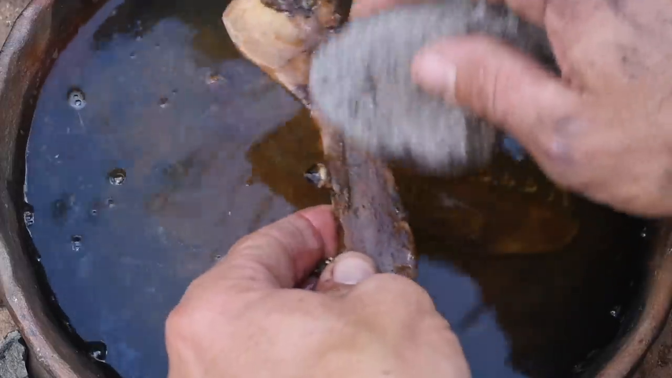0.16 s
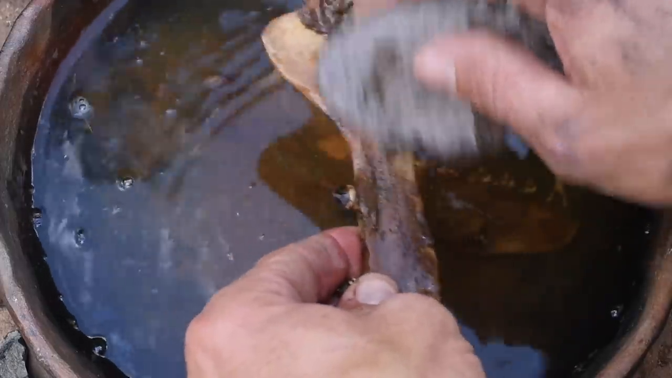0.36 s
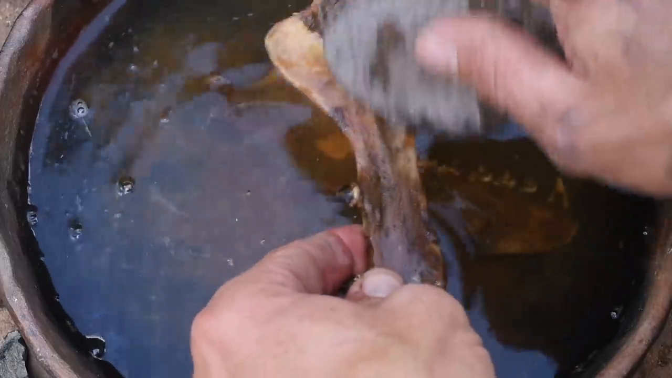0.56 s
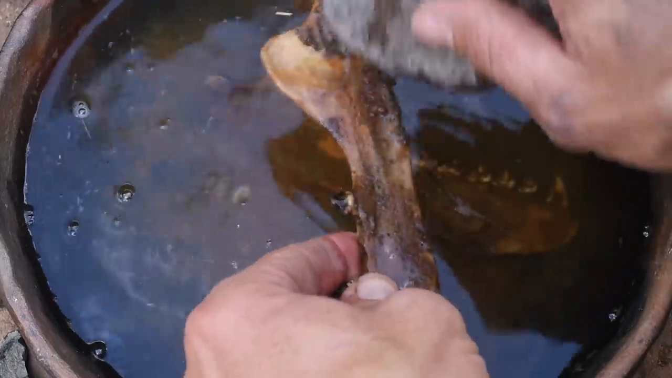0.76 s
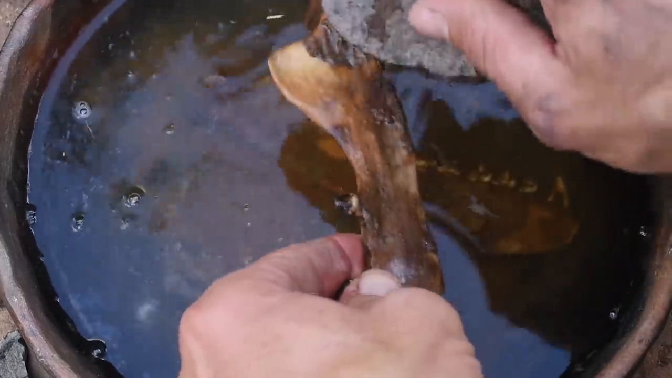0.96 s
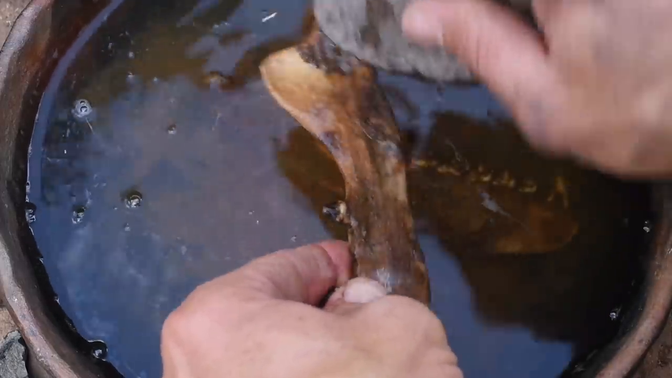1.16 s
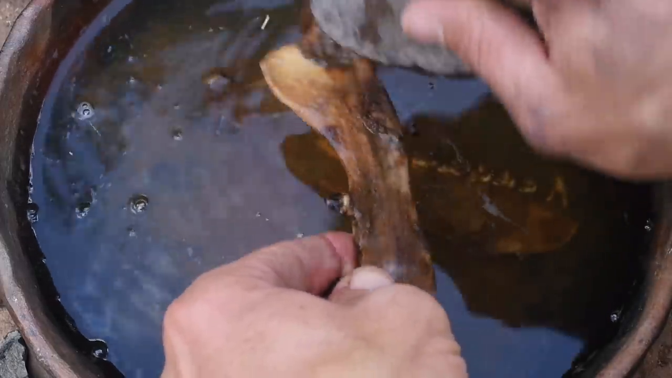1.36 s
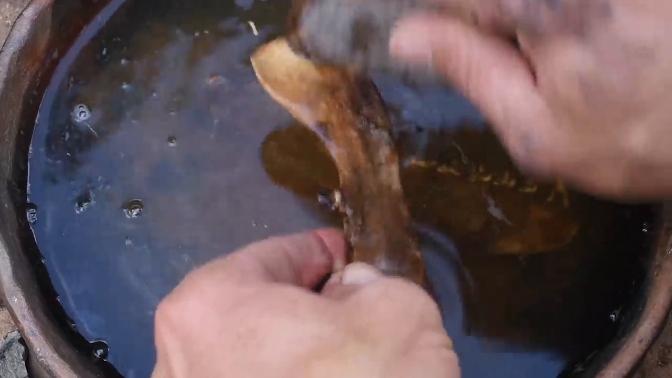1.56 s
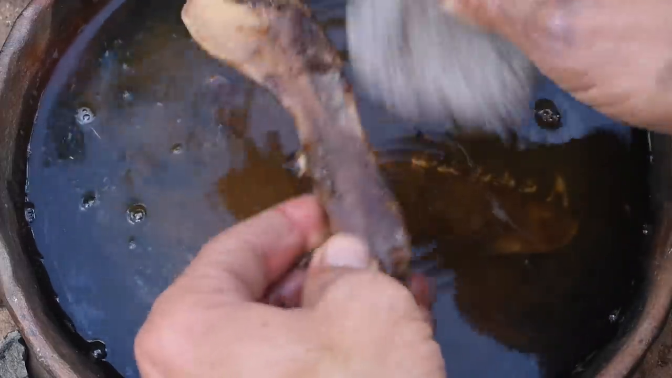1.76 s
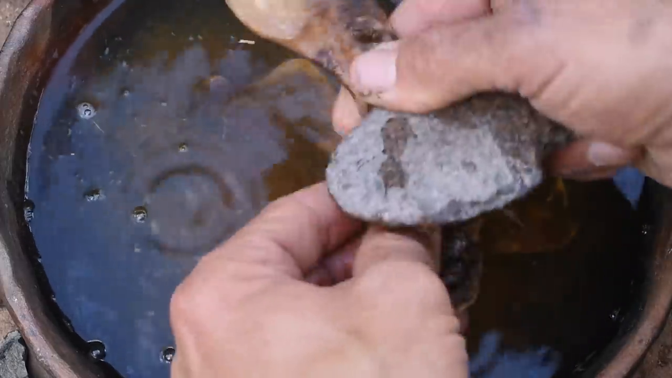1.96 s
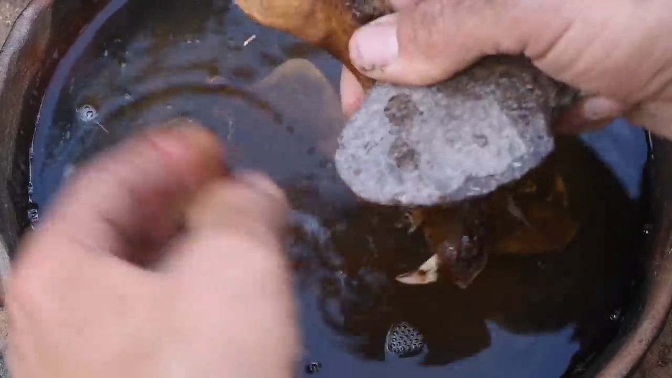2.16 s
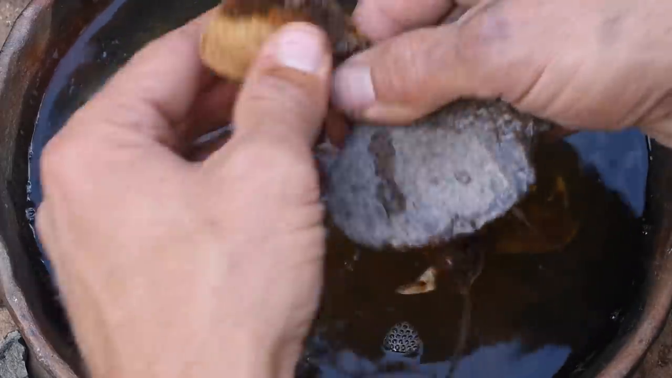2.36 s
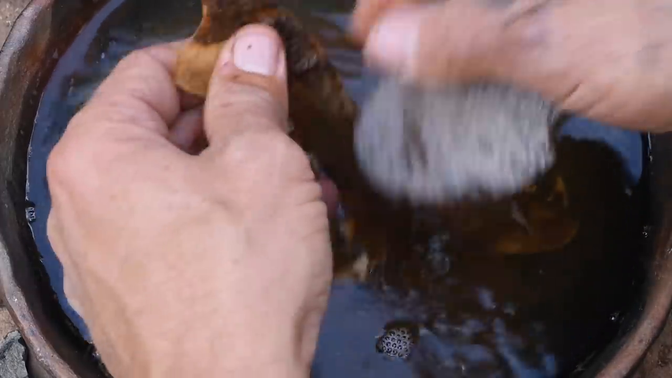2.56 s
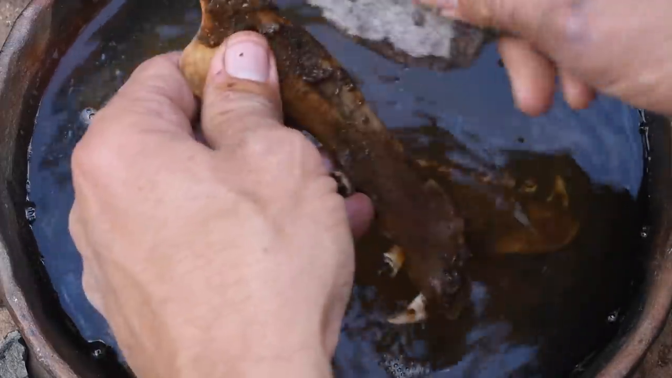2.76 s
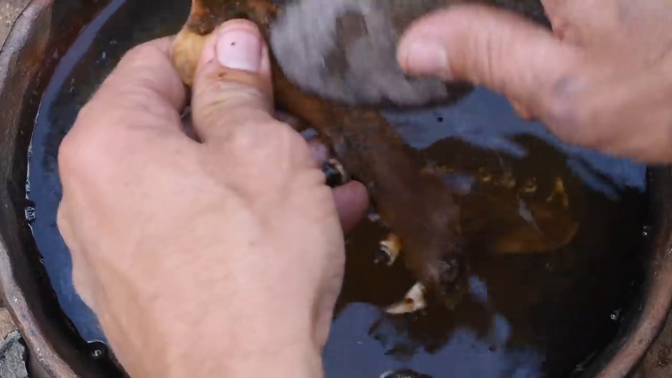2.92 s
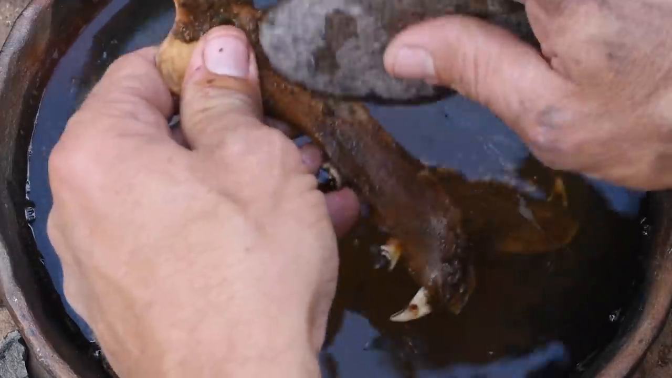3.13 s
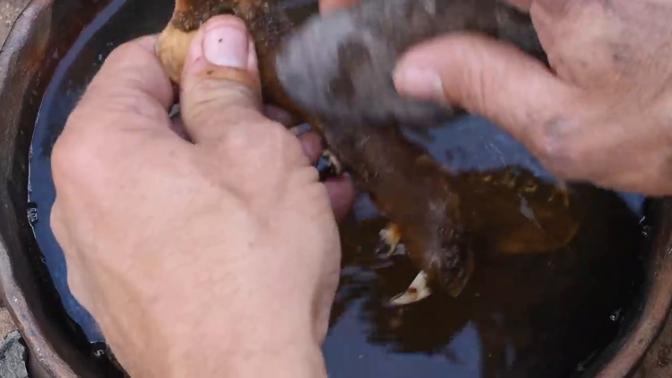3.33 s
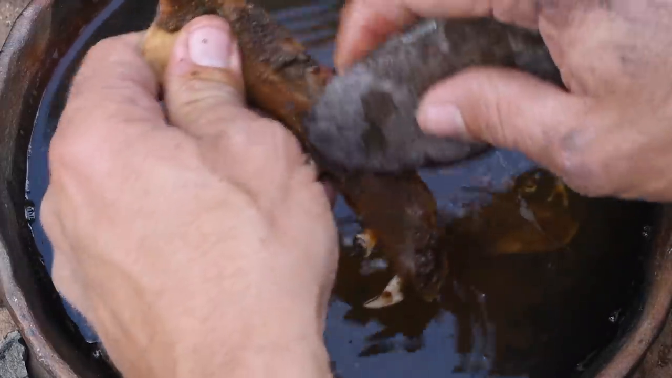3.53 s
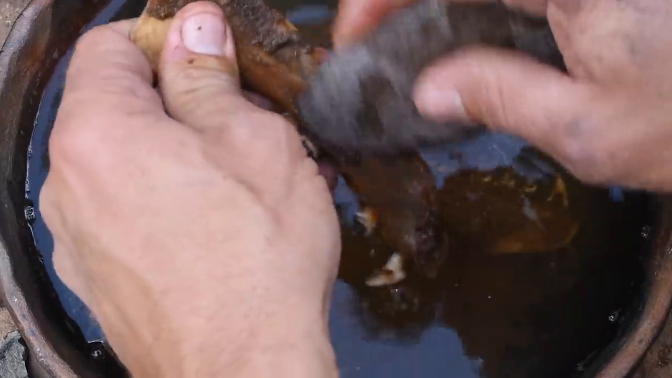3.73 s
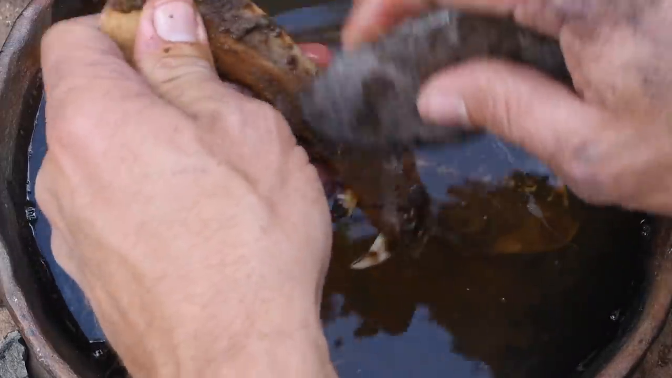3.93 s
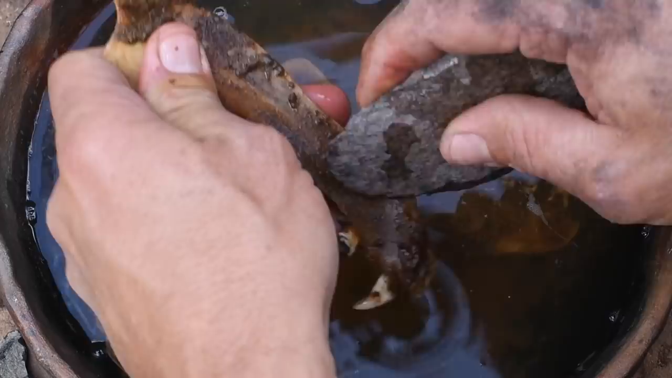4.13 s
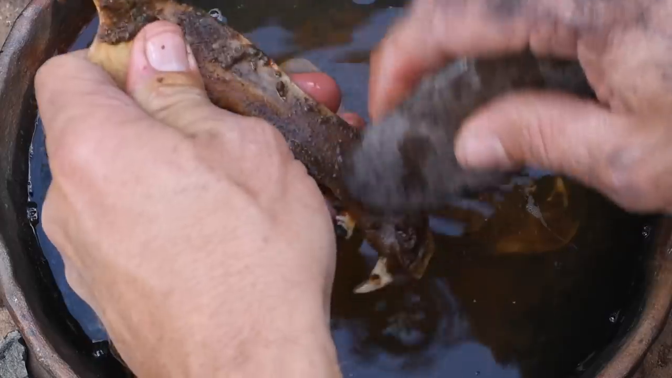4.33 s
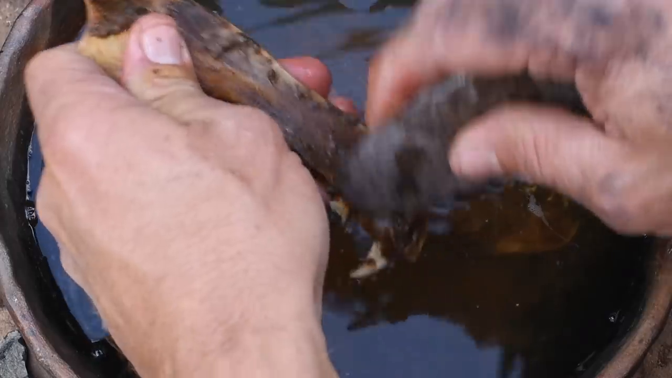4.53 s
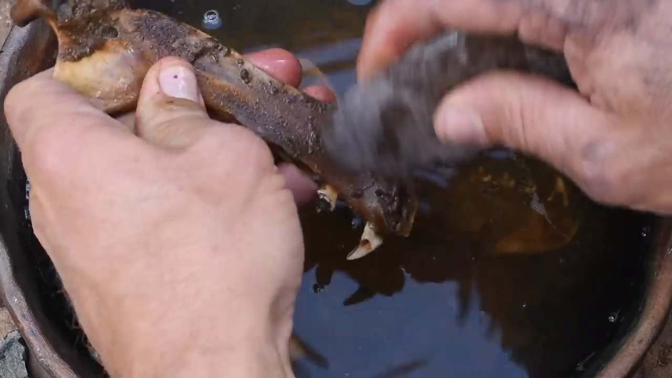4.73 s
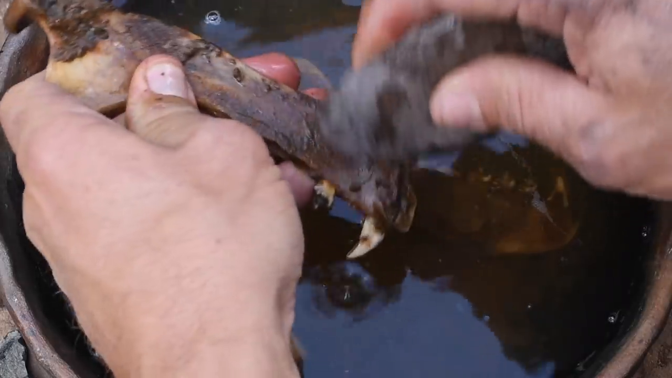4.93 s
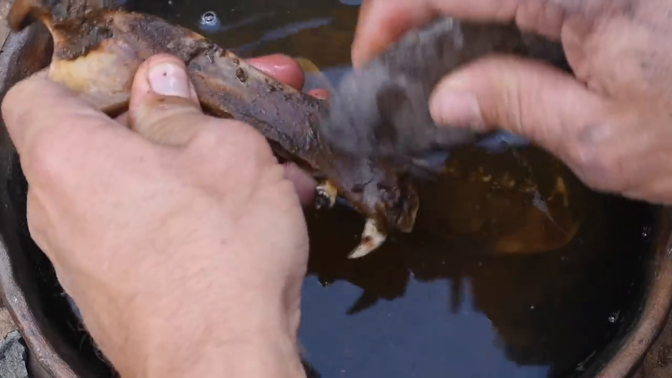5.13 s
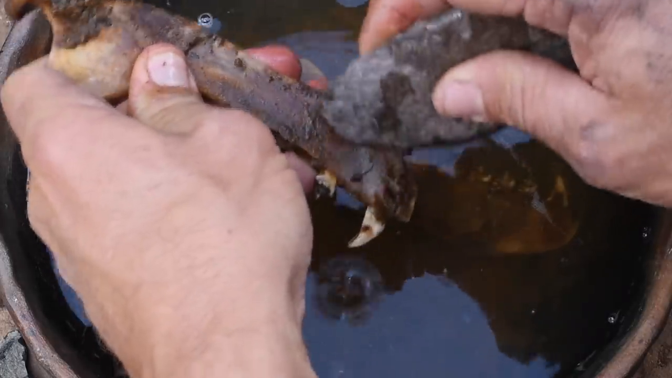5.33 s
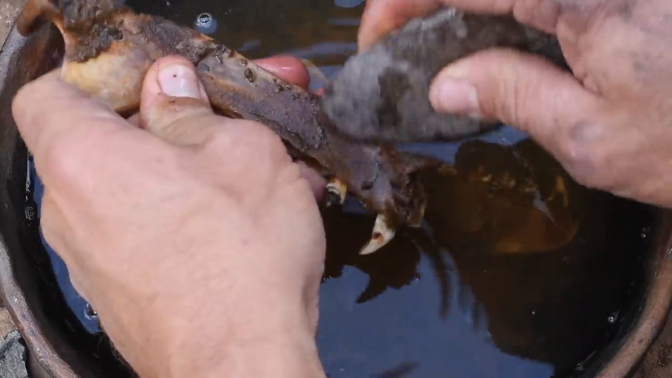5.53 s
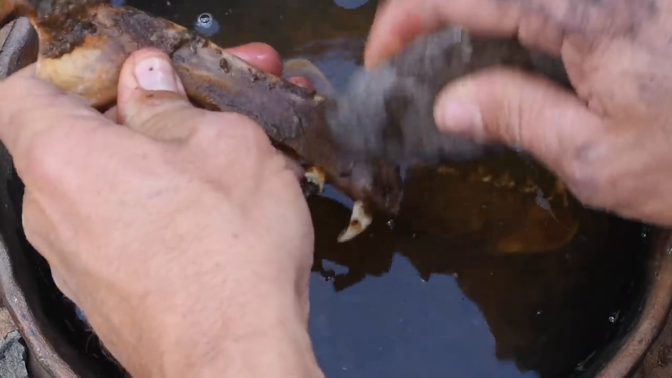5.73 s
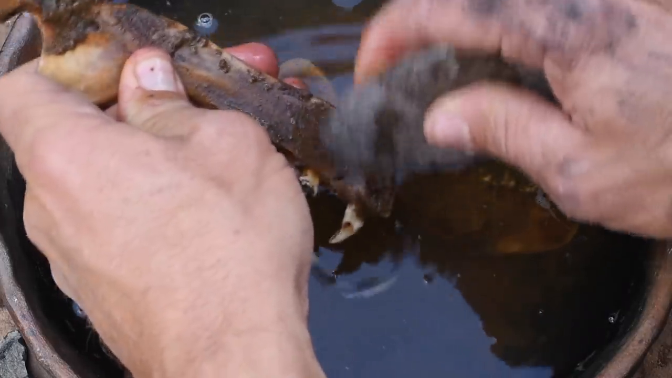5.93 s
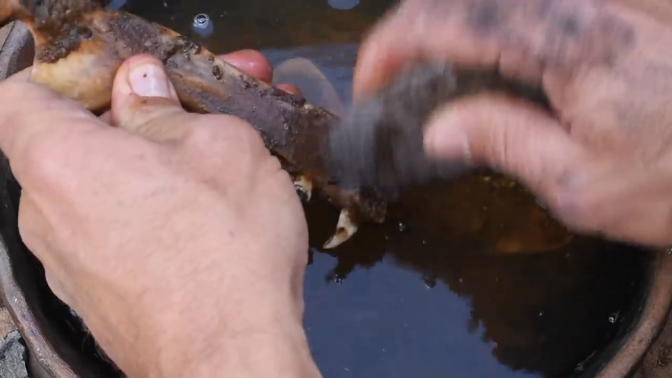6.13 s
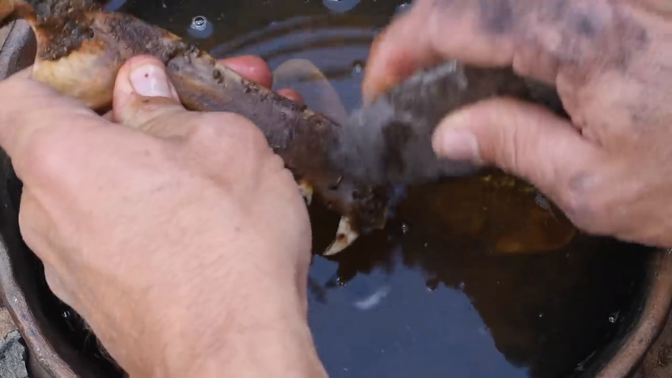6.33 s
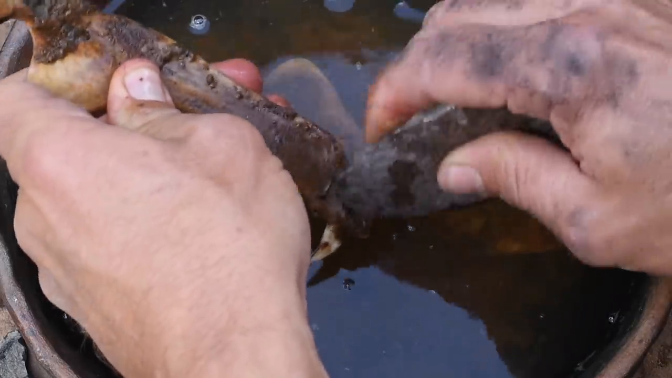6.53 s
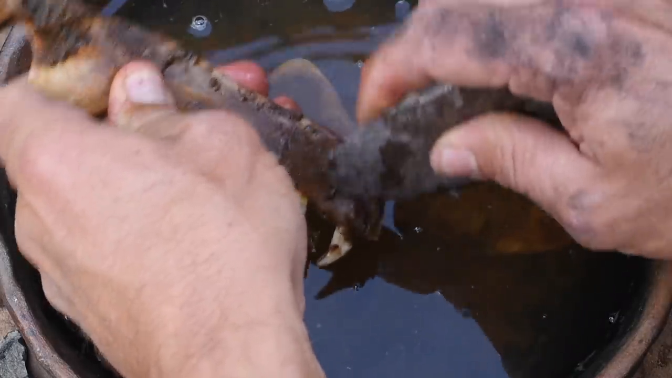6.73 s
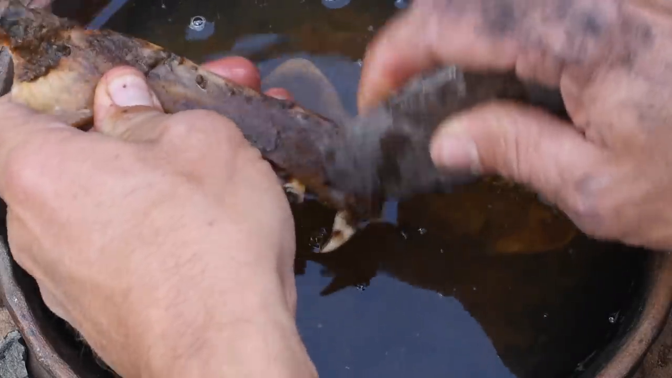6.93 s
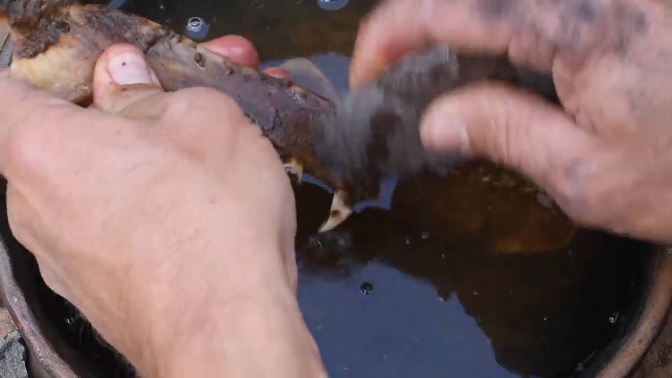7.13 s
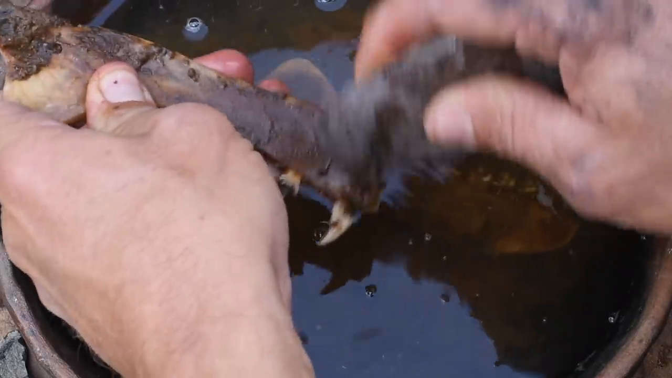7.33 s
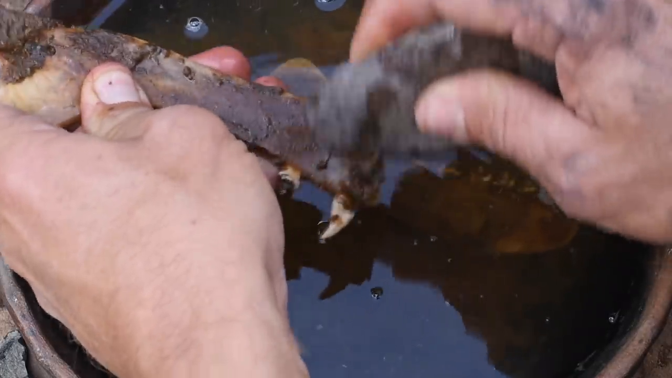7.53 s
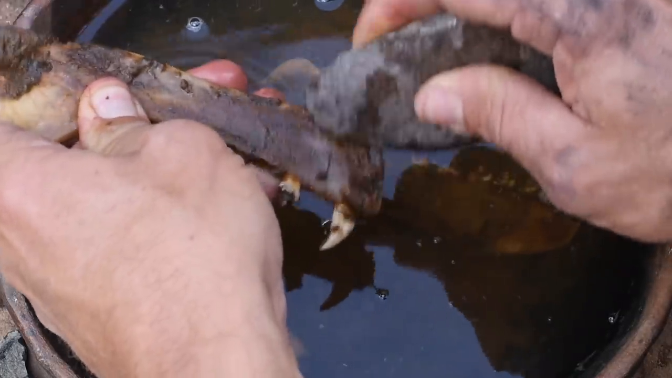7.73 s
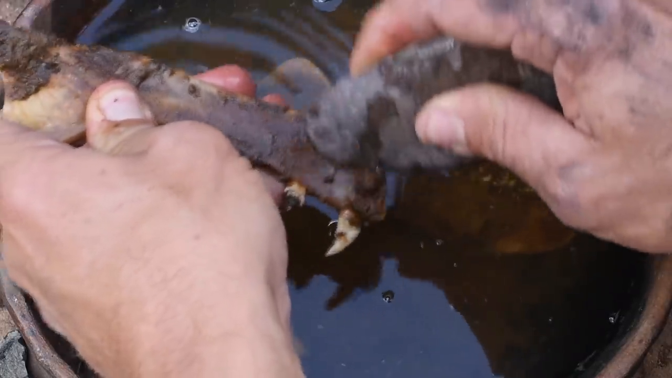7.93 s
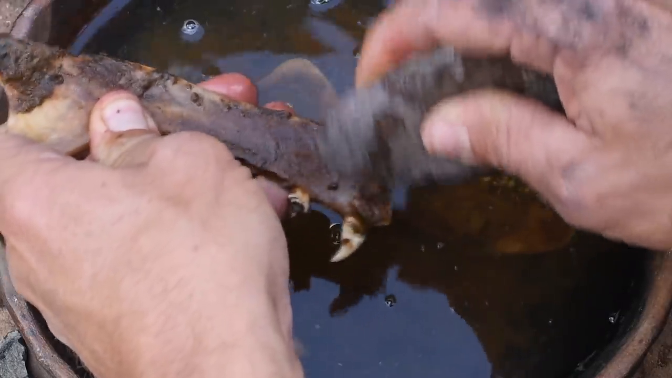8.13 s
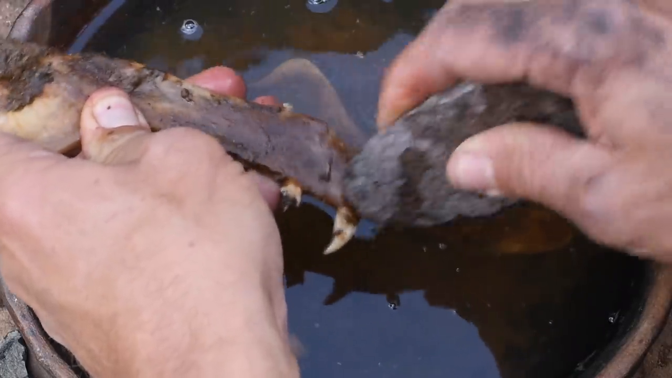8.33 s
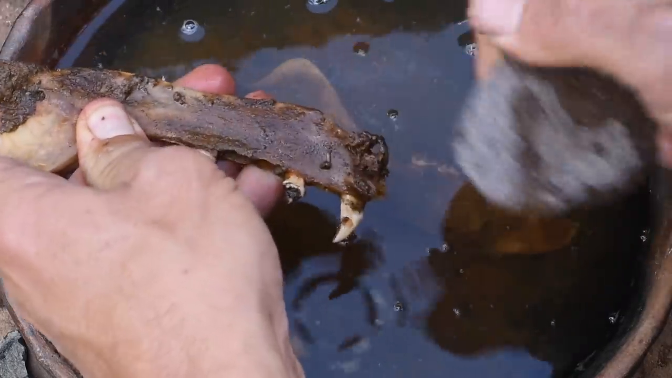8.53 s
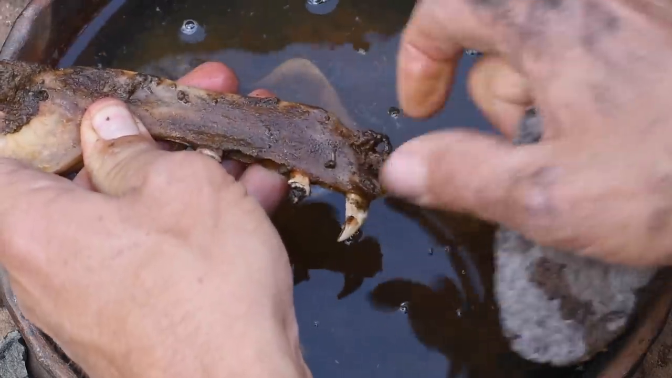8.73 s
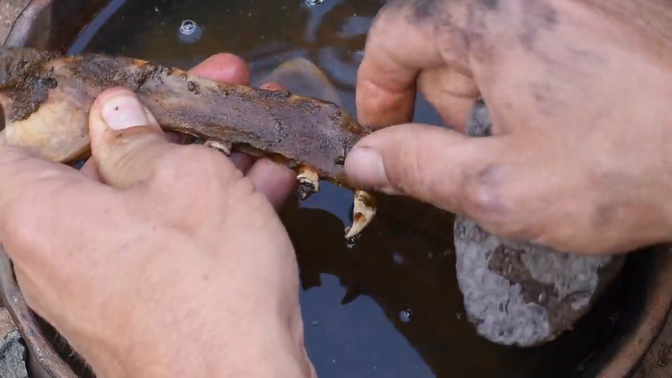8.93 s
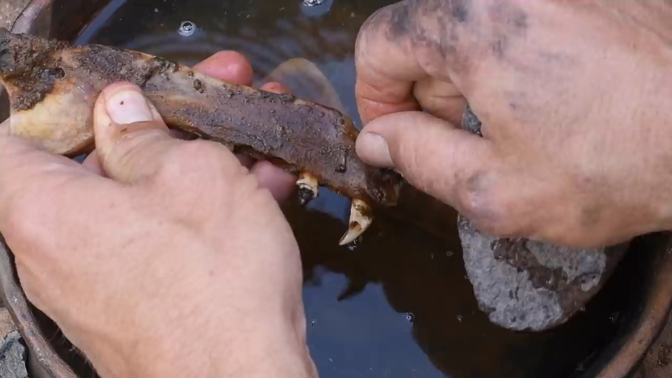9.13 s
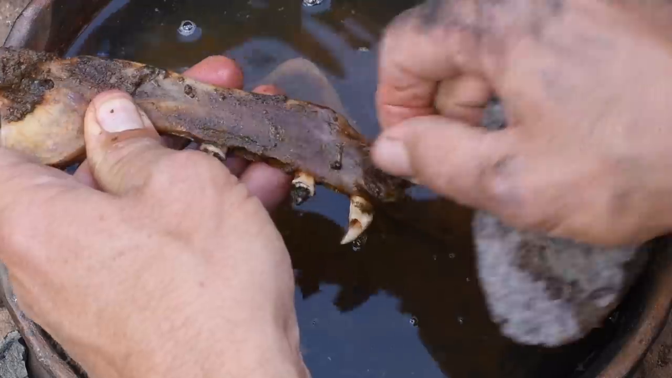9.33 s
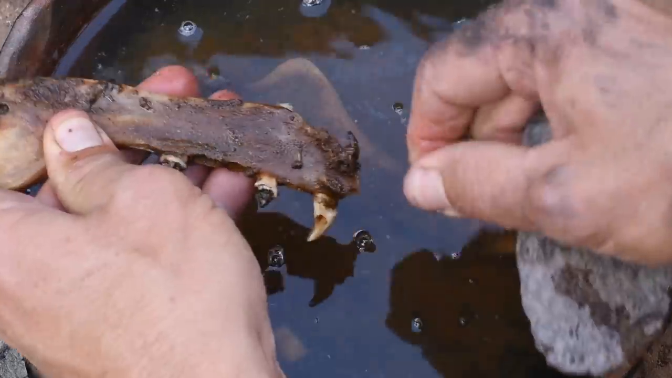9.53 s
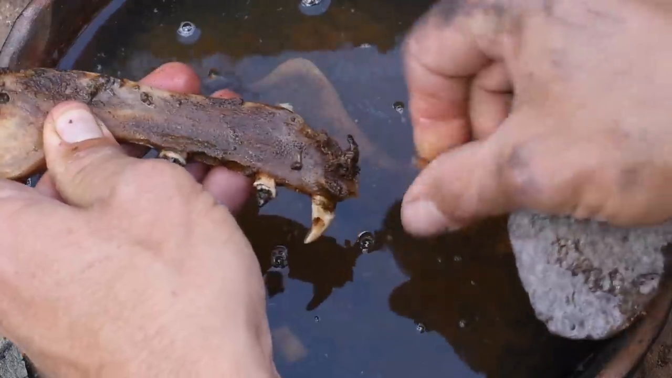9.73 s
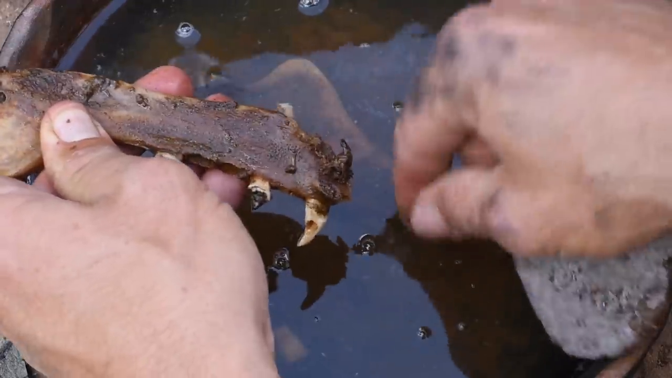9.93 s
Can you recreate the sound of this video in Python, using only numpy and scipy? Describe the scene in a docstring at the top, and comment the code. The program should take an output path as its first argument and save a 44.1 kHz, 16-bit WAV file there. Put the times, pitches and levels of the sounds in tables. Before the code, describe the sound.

Close stereo pickup outdoors: a stone is scrubbed briskly on a damp bone over a tub of water. Loud, hollow, gritty strokes come first, then a brief pause with finger rubs and a tick. Scrubbing resumes brighter and softer, becomes light, uneven scratching, and stops near the end, leaving small skin rustles over low rumble, soft hiss and wind bumps.

```python
"""Stone scrubbed on bone

A rough stone is scrubbed to and fro on a hand-held bone over a tub of water, close to a stereo camera outdoors.
Bursts of random grit, with harder catches, excite resonant modes of the damped bone and the harder stone.
Fingers rub between and after the bouts as shaped noise and short ticks; underneath lie coloured-noise
rumble, hiss and wind on the microphone, and a few faint sine chirps."""
import sys
import numpy as np
from scipy import signal
from scipy.fft import rfft, irfft, next_fast_len
from scipy.io import wavfile
from scipy.ndimage import uniform_filter1d

SR = 44100
rng = np.random.default_rng(int(sys.argv[2]) if len(sys.argv) > 2 else 0)


def store_pcm(level_fs):
    """Save levels as 16-bit WAV."""
    pcm = np.round(np.clip(level_fs, -1, 1) * 32767).astype(np.int16)
    wavfile.write(sys.argv[1], SR, np.atleast_2d(pcm).T)


N = 439677

# stereo image of the close sounds at the two microphone ports:
# pitch_hz, side_level_db (unrelated side against mid), left_louder_db, left_lead_rad
CLOSE_PORTS = [(402.7, -10.5, -3.5, 0.25), (600, -14, 3, 0.32), (1100, -28, 1.5, 0.056),
               (1688, -19, 2, 0.183), (2276, -18, 1.4, 0.089), (3033, -16.5, 1.5, .15),
               (4940, -8, 2.5, 0.0287), (6400, -13, 0.73, 0.95), (7500, -9, 0.5, .1),
               (8600, -6, 0.17, 0.76), (10500, -12.5, 2, 1), (15200, -1.5, 3, .4)]


def undb(db):
    """Decibels to an amplitude factor."""
    return np.exp(np.asarray(db) * np.log(10) / 20)


def unit(x):
    """Scale to an RMS of 1 over all channels."""
    return x / np.sqrt(np.mean(x ** 2))


def ring(x, hz, width_hz):
    """One resonance, gain 1 at its centre."""
    return signal.lfilter(*signal.iirpeak(hz, hz / width_hz, fs=SR), x)


def spectrum_grid():
    """A fast transform length and its bin frequencies in Hz, kept above zero for logarithms."""
    size = next_fast_len(N)
    return size, np.maximum(np.arange(size // 2 + 1) * SR / size, 1)


def colour(x, points_db):
    """Shape a spectrum through (Hz, dB) points, joined straight over log frequency."""
    hz, db = np.transpose(points_db)
    size, bins_hz = spectrum_grid()
    gain = undb(np.interp(np.log(bins_hz), np.log(hz), db))
    return irfft(rfft(x, size) * gain, size)[..., :N]


def walk(rate):
    """Random levels held 1 / rate s and slewed twice; spread near 1."""
    hold = int(SR / rate)
    steps = np.repeat(rng.standard_normal(N // hold + 1), hold)
    slewed = uniform_filter1d(uniform_filter1d(steps, hold), hold)
    return 1.3 * slewed[:N]


def contact(rows, land_db, leave_db, lift_db, land_s, lift_s):
    """Gain over time: each contact lands, swells to its peak, fades and lifts off; the strongest one wins."""
    gain = np.zeros(N)
    t = np.arange(N) / SR
    for (start, swell, fade, db), landing in zip(rows, land_db):
        peak, end = start + max(swell, 1 / SR), start + swell + fade
        a, b = max(int((start - land_s) * SR), 0), int((end + lift_s) * SR)
        # -1 at the start, 0 at the peak, 1 at the end
        arch = np.interp(t[a:b], [start, peak, end], [-1, 0, 1])
        roundness = 1.321
        under = np.where(arch < 0, landing, leave_db) * np.abs(arch) ** roundness
        edges_s = [start - land_s, start, end, end + lift_s]
        under = under + np.interp(t[a:b], edges_s, [lift_db, 0, 0, lift_db])
        gain[a:b] = np.maximum(gain[a:b], undb(db - under))
    return gain


def grains(rate, scatter_db, fade_s, bed, snap):
    """Grit: the level of a quickly dying rattle over a steady bed (power near 1), and a row of clicks."""
    sizes = (rng.random(N) < rate / SR) * undb(scatter_db * rng.standard_normal(N))
    power = signal.lfilter([1], [1, -np.exp(-2 / (fade_s * SR))], sizes ** 2)
    usual = power.mean() * rate / np.mean(rate)
    scale = np.sqrt((bed + 1) * usual)
    rattle = np.sqrt(bed * usual + power) / scale
    clicks = snap * sizes / scale
    return rattle, clicks


def spread(pair, ports):
    """Left and right: the mid signal with unequal level and phase at the ports, plus an unrelated twin as side."""
    hz, *columns = np.transpose(ports)
    size, bins_hz = spectrum_grid()
    side_db, left_db, lead_rad = (np.interp(np.log(bins_hz), np.log(hz), c) for c in columns)
    mid, side = rfft(pair, size)
    side = side * undb(side_db)
    # each port takes half of the level and phase difference
    tilt = undb(left_db / 2) * np.exp(1j * lead_rad / 2)
    return irfft([mid * tilt + side, mid / tilt - side], size)[:, :N]


def outdoors():
    """Far rumble that swells slowly over steady hiss, and wind that bumps the lowest octaves."""
    # air noise spectrum: pitch_hz, density_db (per Hz)
    air_colour = [(20, -11), (65, -13.5), (120, -15.5), (190, -11.5), (300, -23), (500, -28.5),
                  (1000, -30.5), (1600, -36), (2500, -42), (5000, -53.5), (8500, -48.5), (16000, -73)]
    # stereo image outdoors: pitch_hz, side_level_db (against mid), left_louder_db, left_lead_rad
    air_ports = [(30, -10, -0.5, .01), (101.6, -14, -3, .01), (200, -13, -2, .01), (400, -7.5, -1.5, .01),
                 (2426, -7, -0.5, .01), (4400, 1, -0.5, .01), (15010, 1, -1.47, .01)]
    # puffs of wind: peak_s, level_db, fall_s (time to drop 10 dB either side; its sign has no effect)
    puffs = [(0.1, -38.5, 0.51), (0.5, -42, -0.22), (0.81, -40, 0.17), (1.19, -44.5, .2),
             (1.899, -34, -0.02), (2.25, -46.5, -0.01), (3.19, -47.5, -0.21), (6.78, -42, 0.3459),
             (7.08, -45, -0.29), (7.72, -32.5, 0.1366), (8.39, -40, -0.06), (9.08, -43, -0.55),
             (9.55, -56, -0.9)]
    t = np.arange(N) / SR

    air = unit(colour(rng.standard_normal((2, N)), air_colour))
    air = air * undb(-44.5 + 1.1 * walk(1.45))

    rumble_colour = [(30, -36.5), (50, 4), (75, 0.5), (130, -8), (300, -44)]
    rumble = unit(colour(rng.standard_normal((2, N)), rumble_colour))
    rumble = rumble * undb(-45 - walk(2.5))

    wind_colour = [(8, -25.0), (16, 1.5), (32, -7.5), (60, -29), (200, -62.5)]
    wind = unit(colour(rng.standard_normal((2, N)), wind_colour))
    calm = undb(-51)
    wind = wind * (calm + sum(undb(db - 10 * ((t - s) / fall) ** 2) for s, db, fall in puffs))
    return spread(air + rumble + wind, air_ports)


def chirps():
    """Narrow gliding sine tones with soft ends and an unsteady level, equal in both channels."""
    # faint brief tones: start_s, length_s, start_hz, end_hz, level_db (RMS before the flutter)
    tones = [(1.71, 0.032, 4260, 4240, -71), (2.047, 0.026, 4260, 4250, -53.5),
             (2.318, 0.07, 4250, 4170, -62), (2.57, 0.067, 4220, 4140, -69.5),
             (2.815, 0.052, 4150, 4320, -60), (8.191, 0.08, 480, 428, -47),
             (8.625, 0.0484, 2450, 2397, -60.5), (8.72, 0.0345, 3780, 3805, -63.5),
             (9.58, 0.036, 2100, 2146, -59)]
    out = np.zeros(N)
    for s, length, from_hz, to_hz, db in tones:
        i, n = int(s * SR), int(length * SR)
        phase = 2 * np.pi * np.cumsum(np.linspace(from_hz, to_hz, n)) / SR
        tone = np.sqrt(2) * np.sin(phase) * signal.windows.tukey(n, .6)
        out[i:i + n] += undb(db) * tone
    flutter = undb(5 * walk(200))
    return out * flutter


def fingers():
    """Wet skin slides as grainy shaped noise; nails and skin tick as dying noise through a wide resonance."""
    # wet fingers sliding on bone and stone: start_s, swell_s, fade_s, peak_db
    slides = [(2.317, 0.064, .02, -57.5), (2.438, 0.0354, 0.021, -46.5), (2.516, 0.0346, 0.048, -56),
              (2.619, 0.093, 0.074, -49), (2.777, 0.043, 0.091, -47.5), (7.48, 0.033, 0.053, -54),
              (7.927, .06, 0.036, -55.5), (8.461, 0.073, 0.0357, -47), (8.614, 0.0046, 0.102, -46.5),
              (8.708, 0.014, 0.045, -48), (8.988, 0.0083, 0.0156, -54.5), (9.02, 0.0121, 0.017, -49),
              (9.565, 0.107, .07, -51.5), (9.74, 0.082, 0.037, -52), (9.914, 0.0164, 0.036, -51)]
    # small wet ticks of nails and skin: start_s, level_db, centre_hz
    taps = [(2.245, -45, 9000), (2.37, -43.5, 6500), (2.569, -35.5, 6000), (2.698, -27, 2260),
            (8.511, -30.5, 4999), (8.616, -32, 3500), (8.991, -49.5, 6000), (9.029, -53.5, 6000),
            (9.218, -45, 10060), (9.24, -47.5, 10000), (9.346, -44.5, 9000), (9.464, -46.5, 9000),
            (9.646, -36, 4000)]
    # skin noise spectrum: pitch_hz, density_db (per Hz)
    skin_colour = [(1500, -2.5), (3000, -2), (5000, -6), (8500, 1), (12000, -1.5), (16000, -14.5)]
    skin = unit(colour(rng.standard_normal((2, N)), [(700, -33)] + skin_colour))
    edge_db = 12  # under the peak at both ends of a slide
    sliding = contact(slides, np.full(len(slides), edge_db), edge_db, lift_db=8.5, land_s=.008, lift_s=0.013)
    rattle, clicks = grains(rate=380, scatter_db=5.7, fade_s=0.0032, bed=1.0, snap=.1)
    out = skin * sliding * (rattle + clicks)

    t = np.arange(int(.012 * SR)) / SR
    for s, db, hz in taps:
        i = int(s * SR)
        burst = rng.standard_normal((2, len(t))) * np.exp(-t / 0.0042)
        out[:, i:i + len(t)] += undb(db) * ring(burst, hz, 0.6 * hz)
    return spread(out, CLOSE_PORTS)


def body(modes, force, clicks, share, patchy_db, hold):
    """Grit noise and clicks drive a bank of modes; each is reached unevenly as the contact moves."""
    drive = (rng.standard_normal((2, N)) * force + clicks) * share
    # even out the noise power that all the modes pass together
    norm = np.sqrt(sum(undb(np.array(db)) ** 2 * np.pi * width / SR for _, width, *db in modes))
    out = np.zeros((2, N))
    for k, (hz, width, *db) in enumerate(modes):
        level = (undb(db) / norm)[hold % len(db)]  # one level per hold, or one for all
        reach = undb(patchy_db * walk(40))
        out += (-1) ** k * ring(drive * level * reach, hz, width)  # neighbours in opposite phase
    return out


def scrub():
    """Grit under the stone drives the modes of both bodies, under a pressure that swells with each contact."""
    # each contact of stone on bone: start_s, swell_s, fade_s, peak_pressure_db, landing_db (under the peak),
    # low_bone_ring_db, stone_ring_db (both against the peak)
    strokes = np.array([(0.0, 0.0018, 0.0065, -19, 2, -15, -13.5),
                        (0.022, 0.0382, 0.0726, -14.5, 10.5, -14.5, -10),
                        (0.158, 0.0492, 0.0582, -12, 11, -15, -6.0),
                        (0.286, 0.03464, 0.041, -16, 12.5, -11.5, -9.5),
                        (0.373, 0.0549, 0.109, -8, 9, -16.5, -12.5),
                        (0.542, 0.062, 0.0489, -14.5, 20.5, -14.5, -17),
                        (0.671, 0.067, 0.0156, -11.5, 10, -16.5, -7.5),
                        (0.804, 0.0396, 0.0558, -16.5, 8, -20, -18),
                        (0.923, 0.0624, 0.0157, -11.5, 20, -14, -7.0),
                        (1.064, 0.0598, 0.0207, -15.5, 2, -18, -21),
                        (1.157, 0.04655, 0.01477, -7, 9.5, -16.5, -11),
                        (1.286, 0.0129, 0.0515, -15.5, 10.5, -17.5, -16),
                        (1.369, 0.0286, 0.0184, -10.5, 11.5, -15, -12.5),
                        (1.505, 0.0193, 0.0488, -14.5, 6.5, -20.0, -17),
                        (1.588, 0.0377, 0.018, -10, 19, -15.5, -14.5),
                        (1.657, 0.0146, 0.01476, -6.5, 21.5, -14, -7.5),
                        (1.809, 0.0341, 0.0158, -24.5, 17.5, -10.5, -11.5),
                        (1.87, 0.0105, 0.042, -25.5, 4.5, -8, -3.5),
                        (1.899, 0.0394, 0.066, -21.5, 5, -17, -3.5),
                        (1.979, 0.0108, 0.022, -21.5, 10.5, -17.0, -10.5),
                        (2.012, 0.027, 0.0154, -31.0, 5, -12.5, -16.5),
                        (2.075, 0.0216, 0.0187, -23.5, 13.5, -15.5, -19.5),
                        (2.91, 0.1082, 0.0231, -18, 12.5, -18.5, -6.5),
                        (3.064, 0.0405, 0.0243, -23.5, 15.5, -14.5, -4),
                        (3.125, 0.0235, 0.0295, -26, 1.5, -17.5, -6),
                        (3.186, 0.102, 0.034, -21, 8, -12.5, -6.0),
                        (3.337, 0.0305, 0.0972, -18, 10, -13, -3),
                        (3.466, 0.0526, 0.15, -20, 16.5, -12.5, -2.5),
                        (3.568, 0.0267, 0.0314, -22.0, 5, -15, 1.0),
                        (3.645, 0.0315, 0.0384, -16.5, 14.0, -13.5, 2.0),
                        (3.765, 0.0405, 0.0656, -15, 8, -14.5, -1.5),
                        (3.902, 0.0769, 0.00305, -17.0, 8.5, -16, -4),
                        (3.981, 0.0234, 0.0422, -21, 8.5, -12.5, -0.5),
                        (4.067, 0.0845, 0.0077, -24, 6.0, -11, -3.0),
                        (4.214, 0.0598, 0.0142, -18.5, 22, -14.5, -0.5),
                        (4.313, 0.0121, 0.0345, -19.5, 17, -14, -13.5),
                        (4.352, 0.0315, 0.0108, -21.5, 3, -17.5, -6),
                        (4.457, 0.0255, 0.0188, -24.5, 18.0, -20, -7.5),
                        (4.53, 0.0019, 0.0426, -29.5, 4.5, -21.5, -13),
                        (4.577, 0.0322, 0.018, -42.5, 7, -9.5, 1),
                        (4.628, 0.0038, 0.044, -44.0, 15.5, -13, 3.5),
                        (4.669, 0.0254, 0.0436, -36.0, 15, -14, -2.5),
                        (4.76, 0.0192, 0.0334, -40.5, 2, -8.5, -8.5),
                        (4.828, 0.0239, 0.029, -36.5, 15.5, -8.5, -1.5),
                        (4.894, 0.0484, 0.0122, -28.5, 12.5, -14.5, -4.5),
                        (4.976, 0.0042, 0.03, -31, 3, -13, -8),
                        (5.008, 0.014, 0.0234, -37.5, 16.5, -1.5, -4.5),
                        (5.054, 0.0033, 0.0029, -28.5, 10.5, -5.5, 4.5),
                        (5.089, 0.0166, 0.0197, -35, 20, -6, 1.5),
                        (5.134, 0.0076, 0.0127, -21.5, 16.0, -17.5, -3.0),
                        (5.173, 0.0229, 0.0173, -28.5, 19.5, -12.5, -10.0),
                        (5.225, 0.0217, 0.0105, -34.5, 4, -7.5, -3.5),
                        (5.258, 0.0158, 0.0115, -28, 16, -17.5, -6.5),
                        (5.289, 0.0137, 0.012, -38, 6.0, -11.5, -6),
                        (5.331, 0.0111, 0.0356, -28, 6.5, -10, -7),
                        (5.375, 0.0234, 0.022, -33.5, 7, -11.0, -4),
                        (5.424, 0.0344, 0.00755, -27.5, 15.5, -9, -5.5),
                        (5.522, 0.0189, 0.033, -32.5, 4, -9.5, -1.0),
                        (5.558, 0.0193, 0.0449, -24, 11, -14.5, -8),
                        (5.627, 0.0179, 0.0171, -25, 19.0, -10.5, -10),
                        (5.665, 0.0261, 0.0301, -25, 10.5, -9.5, -3.5),
                        (5.756, 0.032, 0.0282, -23.0, 7, -12.5, -1.5),
                        (5.856, 0.03, 0.0588, -23.5, 8.5, -9.0, -5.0),
                        (5.975, 0.0152, 0.0557, -21.0, 8, -11, -3.5),
                        (6.057, 0.0588, 0.0232, -24.5, 16, -8, -4),
                        (6.173, 0.014, 0.0665, -22, 7.5, -12, -6),
                        (6.216, 0.0072, 0.0237, -21.5, 6, -12.5, -1.5),
                        (6.281, 0.0248, 0.0168, -23, 15.5, -7.5, -2.5),
                        (6.435, 0.0115, 0.0188, -40, 20.0, -10.5, -5.5),
                        (6.473, 0.0812, 0.003, -28.0, 19.5, -7, -7.5),
                        (6.614, 0.001, 0.0061, -39.5, 2, -17.5, -2),
                        (6.633, 0.0074, 0.0327, -35.5, 20, -6.5, -3.5),
                        (6.72, 0.0257, 0.0154, -42, 17, -7.5, 5),
                        (6.755, 0.011, 0.0133, -30, 18.5, -2, -6.5),
                        (6.781, 0.0204, 0.0096, -31.5, 15, -9, 0),
                        (6.834, 0.0365, 0.0072, -30.5, 28, -7, 1),
                        (6.882, 0.0134, 0.0196, -32.0, 12, -10.0, -10.5),
                        (6.93, 0.0486, 0.0087, -30.5, 9.5, -11.0, -2.5),
                        (7.024, 0.046, 0.041, -49.5, 10, -8.5, -1.5),
                        (7.099, 0.00252, 0.0041, -22.5, 26, -13, 0.5),
                        (7.146, 0.0555, 0.02, -28.5, 14.0, -10, -3.5),
                        (7.266, 0.0193, 0.0213, -28, 9, -9.5, -9.5),
                        (7.302, 0.00333, 0.0095, -27, 18.0, -5.5, -22),
                        (7.352, 0.049, 0.007, -48.5, 10, -3.5, -9),
                        (7.402, 0.0223, 0.014, -38, 11.5, -15, -19),
                        (7.61, 0.0202, 0.006, -34, 16.5, -9.5, -9.0),
                        (7.635, 0.0104, 0.0063, -29, 17, -13.0, -1),
                        (7.696, 0.0041, 0.0506, -31.5, 5.5, -7, -7),
                        (7.76, 0.0021, 0.0078, -28.5, 1, -13, -1.5),
                        (7.797, 0.0103, 0.0173, -25.5, 16, -10.5, -10),
                        (7.831, 0.0387, 0.0187, -41.5, -1, -12.5, -19),
                        (8.085, 0.0104, 0.026, -30, 23, -8.5, -11.5),
                        (8.166, 0.0191, 0.0417, -36, -3.5, -8, -3),
                        (8.234, 0.0068, 0.0076, -30.5, 23, -11.5, -4),
                        (8.269, 0.0898, 0.0482, -24.5, 7.5, -13, -10.5),
                        (8.408, 0.0205, 0.0089, -29.5, 6.5, -12.5, -5.0)])
    # ridges that catch hard: start_s, bite_db (relative force)
    catches = [(0.0293, -24), (0.1667, -18.5), (0.185, -17), (0.2284, -7), (0.291, -19.5), (0.387, -5),
               (0.4373, -6), (0.453, -8.5), (0.509, -20), (0.5265, -37), (0.555, -15.5), (0.585, -23),
               (0.6447, -31), (0.6643, -22), (0.685, -3.5), (0.8298, -20), (0.912, -20), (0.9656, -9),
               (1.0648, -6.5), (1.288, -18), (1.2332, -21.5), (1.346, -20.5), (1.509, -17.5), (1.536, -19),
               (1.552, -9), (1.574, -20), (1.836, -14), (1.8709, -17), (1.8772, -14.5), (1.915, -15.5),
               (1.9297, -20.5), (1.9916, -9.5), (2.0374, -23), (2.901, -18.5), (2.915, -17.5),
               (2.9353, -15.5), (2.9825, -9.5), (3.098, -13.5), (3.1242, -15), (3.1508, -20),
               (3.167, -19.5), (3.193, -20), (3.336, -27.5), (3.357, -21), (3.4888, -14), (3.5626, -12),
               (3.5921, -11.5), (3.707, -16.5), (3.9045, -25), (3.8275, -12.5), (3.938, -21), (3.973, -10),
               (4.161, -20), (4.3815, -12), (4.4832, -14), (4.4983, -23.5), (4.5337, -18), (4.634, -33.5),
               (4.8691, -31), (4.9098, -26.5), (4.925, -26), (5.101, -28.5), (5.1397, -24), (5.2276, -23.5),
               (5.3387, -31), (5.445, -26), (5.569, -17), (5.64, -24.5), (5.7592, -16.5), (5.7898, -16.5),
               (5.8194, -17), (5.895, -27), (5.9953, -17), (6.0786, -19.5), (6.186, -14), (6.2016, -10),
               (6.2244, -19.5), (6.24, -24.5), (6.444, -29), (6.4964, -32), (6.513, -35), (6.611, -23),
               (6.6376, -24), (6.7635, -20.5), (6.7893, -29), (6.8928, -32.5), (6.977, -26), (7.1, -19.5),
               (7.19, -16), (7.218, -22), (7.2802, -17.5), (7.3046, -19), (7.3903, -28), (7.6248, -19.5),
               (7.641, -27), (7.7322, -32.5), (7.7587, -15.5), (7.8006, -27), (8.0968, -12.5), (8.115, -33),
               (8.127, -23.5), (8.1644, -20.5), (8.186, -29), (8.2026, -35.5), (8.2393, -22),
               (8.2674, -30.5), (8.284, -18.5), (8.31, -17), (8.321, -29.5), (8.3321, -14), (8.348, -21.5),
               (8.358, -15.5), (8.371, -16), (8.426, -29)]
    # the hand changes its hold on the bone, the stone its place: change_s
    hold_changes = [2.4, 3.33, 4.6, 7.5]
    # low and upper bone modes: pitch_hz, width_hz, then level_db in each of the five holds
    bone_low = [(617.7, 130, -13.5, -11, -8, -5, -2), (794.4, 182.4, -5.5, -7, -5.5, -9, -9),
                (1068.4, 356, -4, -1.5, -1.5, -5.5, -11), (1277.8, 385, -4, -1.5, -1, -1, -0.5),
                (1557.7, 283, -3.5, -1.5, -1.5, 1, 3.5), (1701.6, 266, -3.5, -7.5, -6.5, -5.5, 2),
                (2184.5, 335, -11.5, -10.5, -8.5, -6.5, -2)]
    bone_high = [(2563, 240.4, -7, -3, -2, -3, 0), (2971, 349, -7, 0, -0.5, -3, 2.5),
                 (3793.4, 433, -10, -4, 1, -4.5, 1), (4347, 219, -9.5, 7, 0, -8, -0.5),
                 (5353, 2280, -16.5, -35.5, -9.5, -13, -6.5)]
    # stone modes, the low ones a close pair: pitch_hz, width_hz, level_db
    stone_low = [(6500, 169, 7.5), (6780, 370, -7)]
    stone_high = [(8559, 290, 0), (9585, 761, -4), (10570, 3110, -10), (13540, 300, -10),
                  (14520, 2200, -24.5), (6990, 790, -10.5)]
    t = np.arange(N) / SR

    pressure = contact(strokes[:, :4], strokes[:, 4], leave_db=17, lift_db=21.24, land_s=0.00782, lift_s=0.0065)
    # hard pressure packs the grit into an even rasp, light pressure leaves separate ticks
    packed = np.minimum(pressure / undb(-20), 1)
    rattle, clicks = grains(200 + 400 * packed, scatter_db=3.15, fade_s=0.001416,
                            bed=0.11 + 0.69 * packed, snap=2.7)
    force, clicks = pressure * rattle, pressure * clicks

    # each catch adds a click and a short dying rattle
    blows = np.zeros(N)
    for s, db in catches:
        blows[int(s * SR)] = undb(db)
    catch_fade_s = 0.00256
    catch_rattle = signal.lfilter([1], [1, -np.exp(-1 / (catch_fade_s * SR))], 0.641 * blows)
    force = np.hypot(force, catch_rattle)
    clicks = (clicks + 3.47 * blows) * np.sign(rng.standard_normal((2, N)))

    # the ring balance follows the stroke, from just before it starts
    stroke = np.clip(np.searchsorted(strokes[:, 0] - .006, t) - 1, 0, None)
    low, stone = (uniform_filter1d(undb(column[stroke]), size=100) for column in strokes.T[-2:])
    hold = np.searchsorted(hold_changes, t)
    # grit hiss: a level in dB for each hold, plus 0.2976 dB per dB of stone ring
    hiss = undb([-7.5, -8.5, -7, -8, -5.5])[hold] * stone ** 0.2976

    rasp = undb(7.5) * body(bone_low, force, clicks, low, 2.072, hold)
    rasp += undb(-11.5) * body(bone_high, force, clicks, 1, 2.723, hold)
    rasp += undb(-1.35) * body(stone_low, force, clicks, stone, 3.225, hold)
    rasp += undb(1.5) * body(stone_high, force, clicks, hiss, 2.98, hold)
    # a small body radiates little bass; the holding hand thuds faintly below it
    rasp = signal.sosfilt(signal.butter(N=3, Wn=520, btype="high", fs=SR, output="sos"), rasp)
    rasp = rasp + undb(-15.0) * body([(311, 300, 0)], force, clicks, low, 1.6, hold)

    # the water and the wall of the tub send back a faint, short wash: 60 dB down in 0.152 s
    wash = rng.standard_normal(SR // 4) * undb(-60 * t[:SR // 4] / 0.152 - 55)
    rasp = rasp + signal.fftconvolve(rasp, wash[None, :])[:, :N]
    balance_db = -2  # left minus right, on top of the ports
    return spread(rasp, CLOSE_PORTS) * undb([[balance_db / 2], [-balance_db / 2]])


def scene():
    """The scrubbing and the fingers over chirps and outdoor air."""
    return outdoors() + chirps() + fingers() + scrub()


def record(dry):
    """The camera rounds the loudest peaks and cuts the top steeply at 15.9 kHz."""
    soft = np.tanh(1.1 * dry) / 1.1
    return signal.sosfilt(signal.ellip(12, .2, 100, 15900, fs=SR, output="sos"), soft)


dry = scene()
out = record(dry)
store_pcm(out)
```